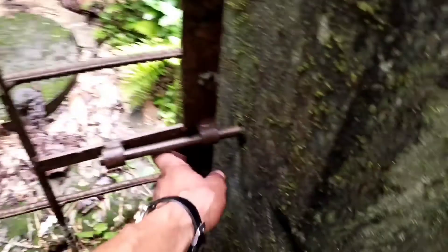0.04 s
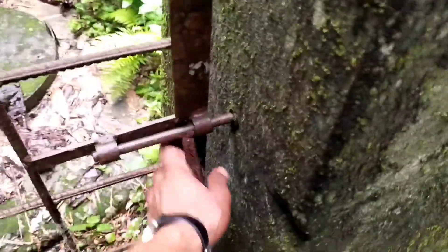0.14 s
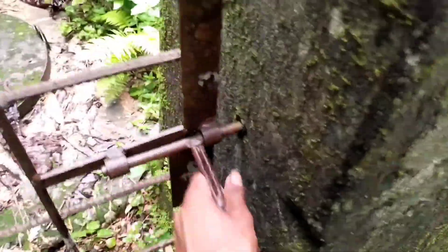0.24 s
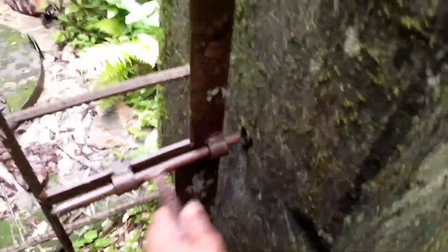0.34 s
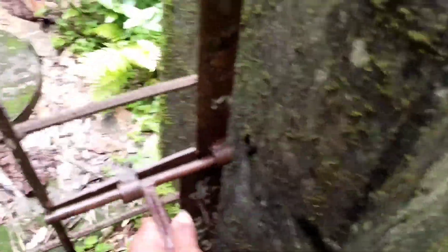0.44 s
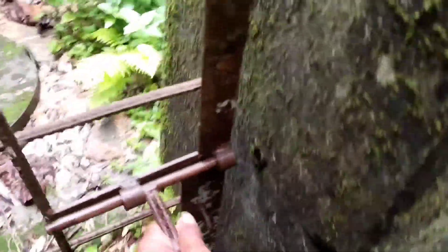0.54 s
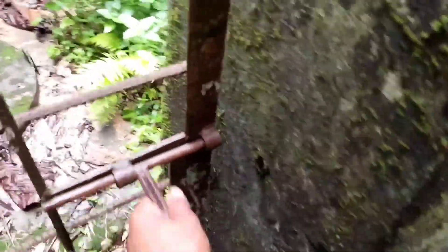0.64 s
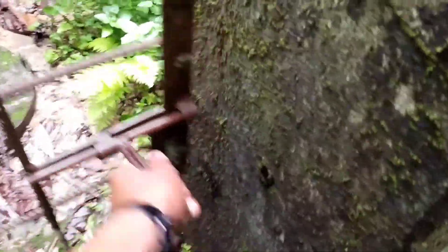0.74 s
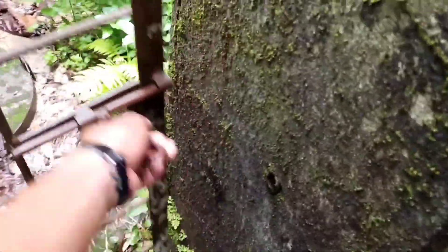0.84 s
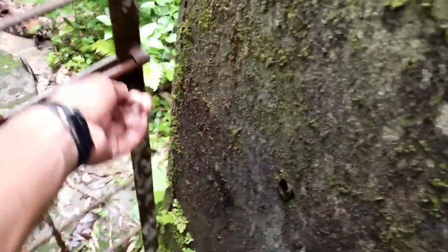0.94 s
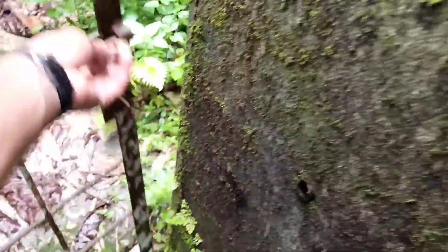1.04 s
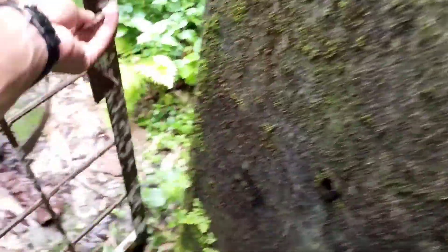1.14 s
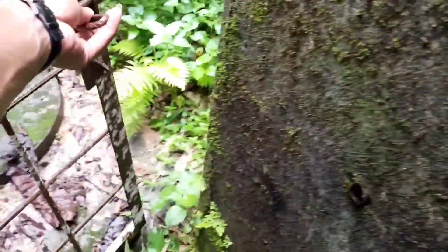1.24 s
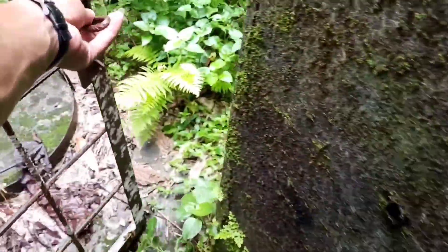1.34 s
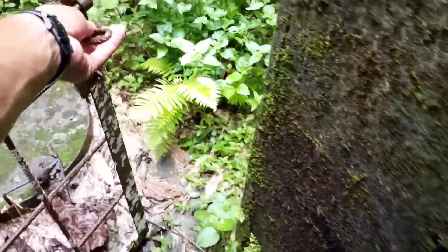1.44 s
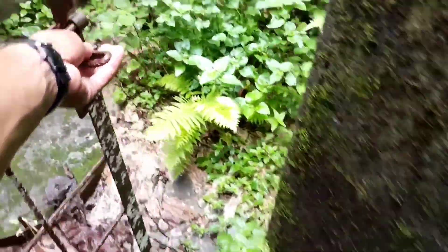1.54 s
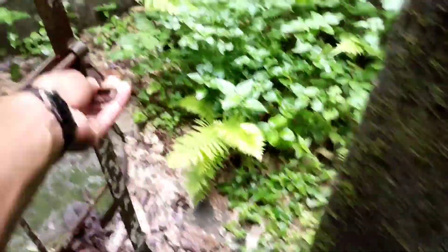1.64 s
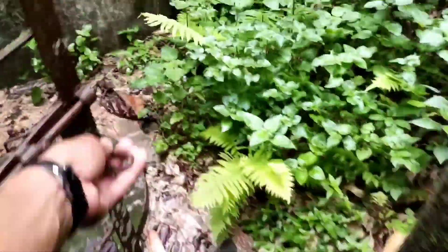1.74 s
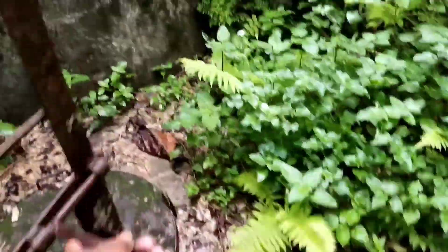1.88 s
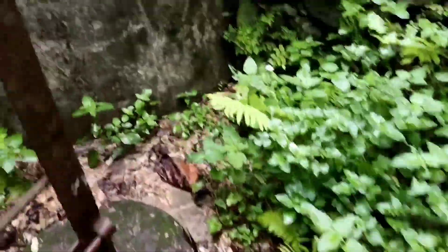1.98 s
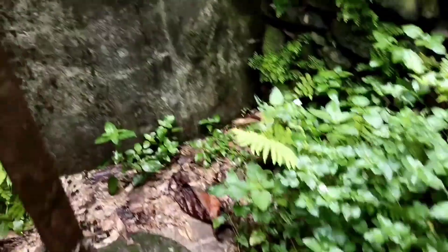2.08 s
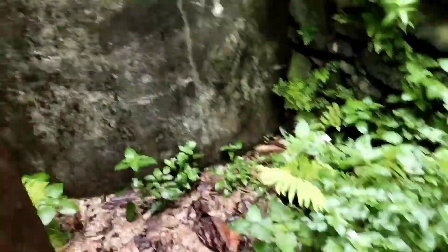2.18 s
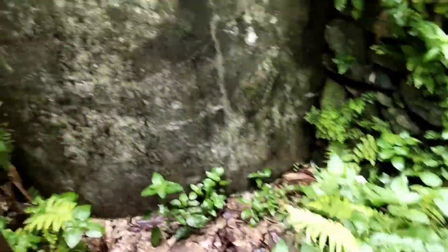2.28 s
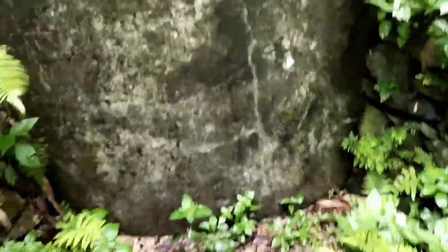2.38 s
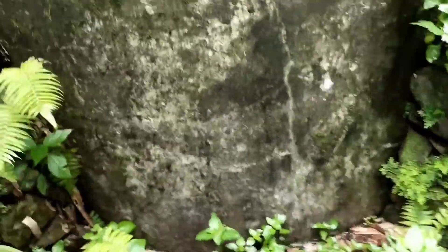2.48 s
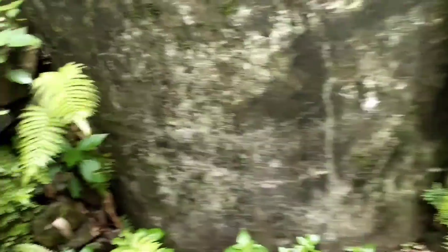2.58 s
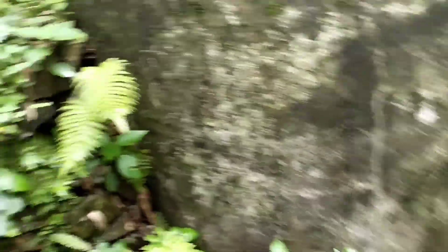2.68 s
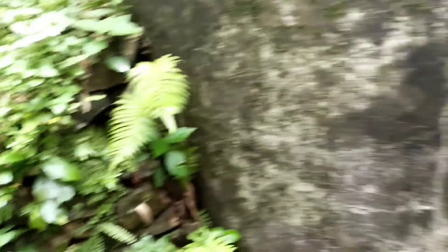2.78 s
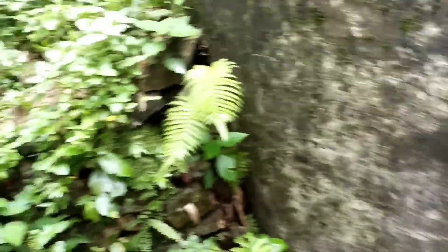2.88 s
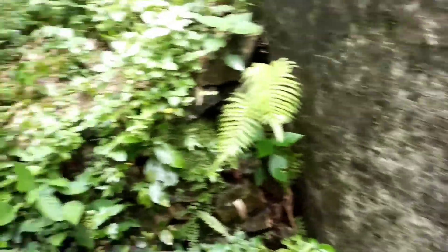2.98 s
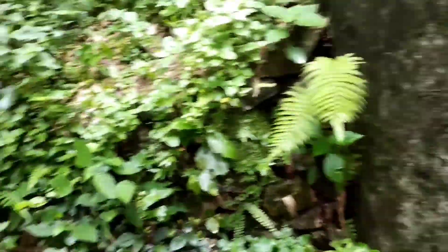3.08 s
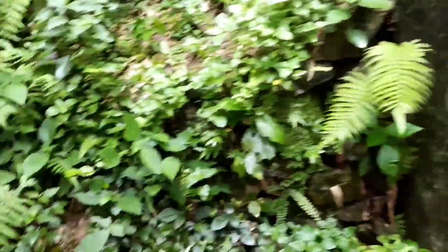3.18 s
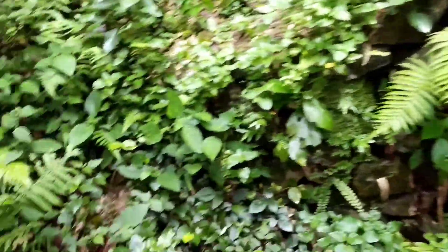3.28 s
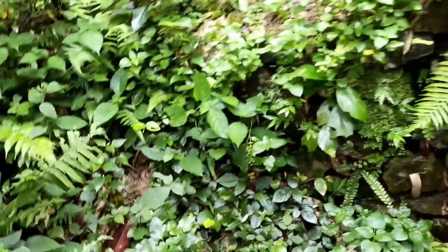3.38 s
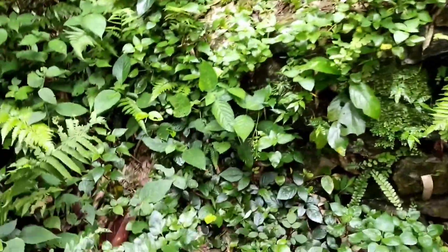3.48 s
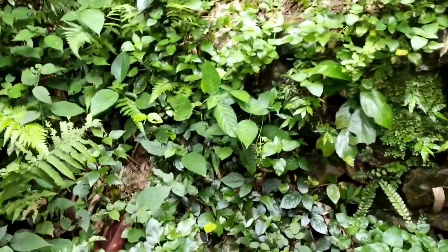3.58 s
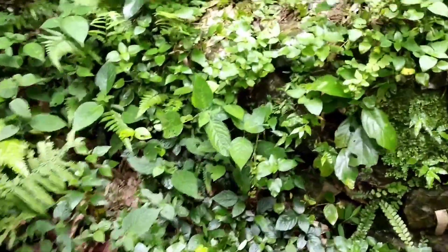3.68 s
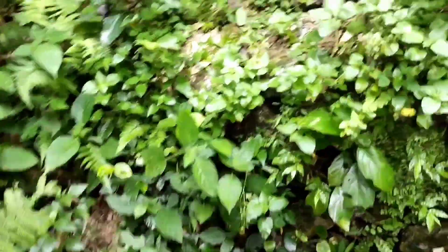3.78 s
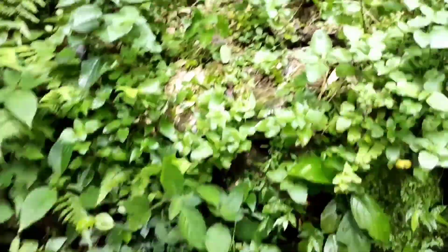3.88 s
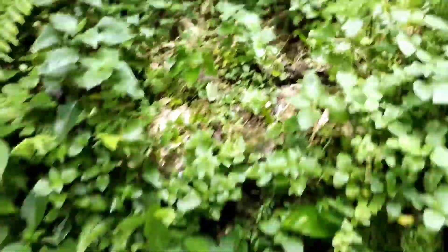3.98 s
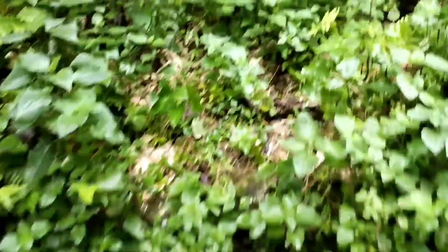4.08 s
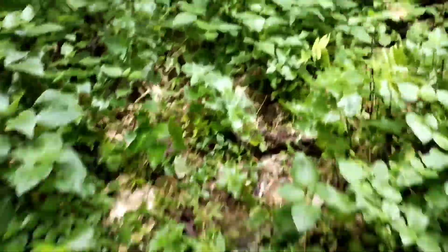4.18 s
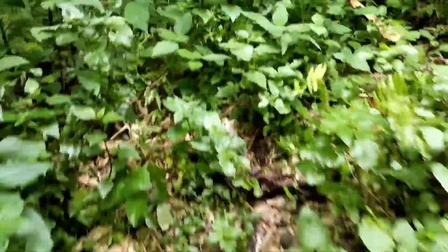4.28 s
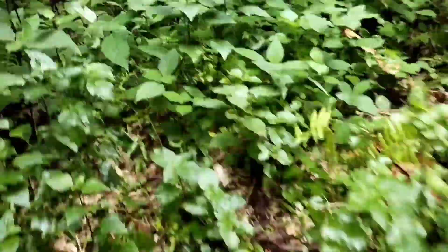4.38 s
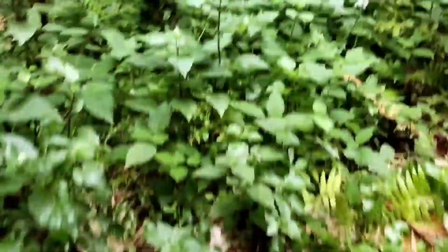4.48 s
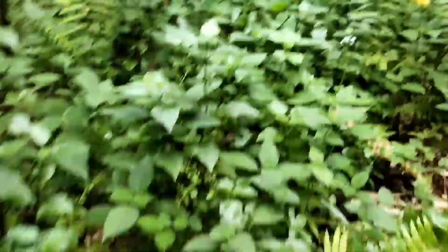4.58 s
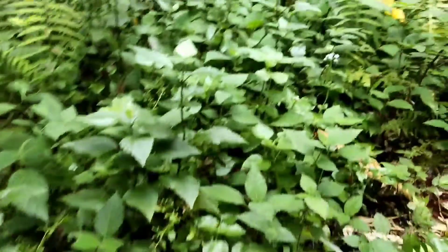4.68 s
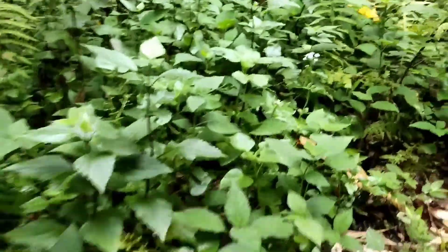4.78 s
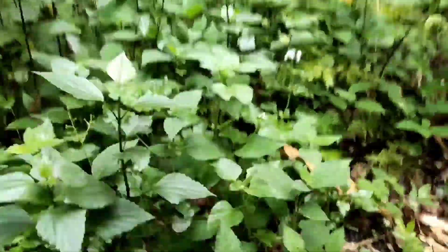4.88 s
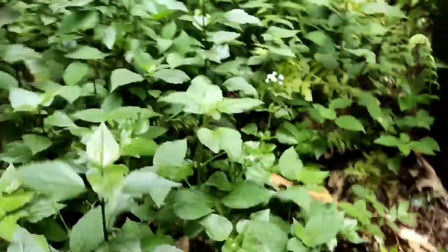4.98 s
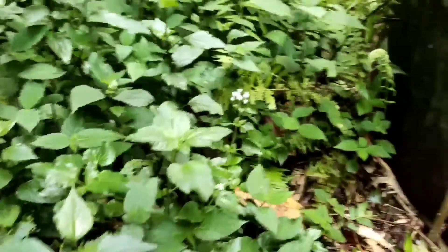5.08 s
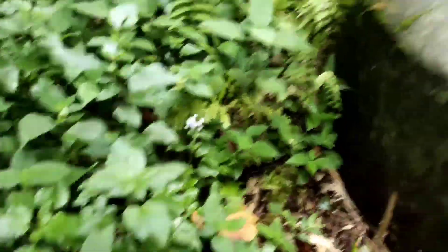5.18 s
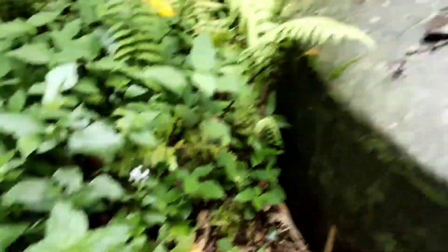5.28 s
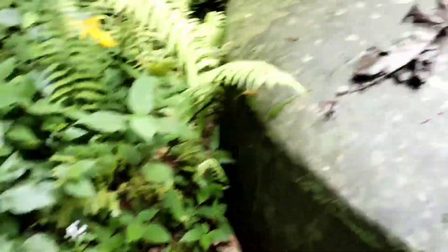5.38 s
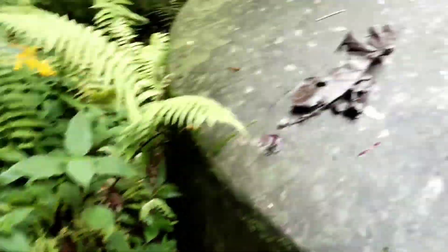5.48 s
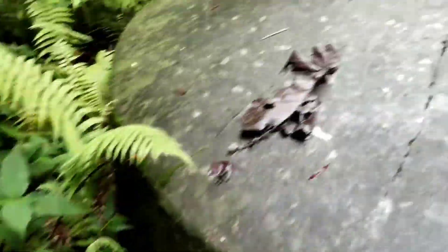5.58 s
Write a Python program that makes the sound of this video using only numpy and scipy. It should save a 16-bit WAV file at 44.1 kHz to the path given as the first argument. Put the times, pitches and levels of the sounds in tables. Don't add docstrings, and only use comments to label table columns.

```python
import sys
import numpy as np
from scipy import signal
from scipy.fft import rfft, irfft
from scipy.io import wavfile
from scipy.ndimage import uniform_filter1d

SR = 44100
rng = np.random.default_rng(int(sys.argv[2]) if len(sys.argv) > 2 else 0)


def master(y):
    cut = np.clip(np.atleast_2d(y).T, -1, 1)
    pcm = np.round(cut * 32767)
    wavfile.write(sys.argv[1], SR, pcm.astype(np.int16))


def gain_from_db(level_db):
    decades = np.asarray(level_db, float) / 20
    return 10 ** decades


N = 248555


def evened(x):
    return x / np.sqrt(np.mean(x ** 2) + 1e-20)


def read(points, hz):
    f, value = np.transpose(points)
    return np.interp(np.log(hz + 1), np.log(f + 1), value)


def add(mix, s, sound):
    part = mix[:, round(s * SR):][:, :sound.shape[1]]
    part += sound[:, :part.shape[1]]


def sides(pan_db):
    return gain_from_db(np.array([[.5], [-.5]]) * pan_db) / np.cosh(pan_db * np.log(10) / 40)


def noise(shape, level_db, patchy_db, grain_db, size=512):
    # (frequency [Hz], correlation [-1..1])
    likeness = [(60, 0.4), (180, 0.94), (550, 0.73), (1650, -0.19), (4970, 0.073), (15000, -0.026)]
    # (frequency [Hz], left-right [dB])
    balance = [(60, 0.0), (180, 0.5), (550, -1), (1650, 2), (4970, 6.5), (15000, -2.5)]
    frames, hz = 4 * N // size + 5, np.fft.rfftfreq(size, 1 / SR)
    a, b, c, d, patches = rng.standard_normal((frames, len(hz), 5)).T
    patches = uniform_filter1d(patches, size=3, axis=0)
    patches = evened(uniform_filter1d(patches, size=12, axis=1))
    flicker = np.minimum(rng.exponential(1, frames), 5)
    same = np.clip(read(likeness, hz), -1, 1)[:, None]
    left = a + 1j * b
    right = same * left + np.sqrt(1 - same ** 2) * (c + 1j * d)
    z = np.array([left, right])
    z *= gain_from_db(read(shape, hz)[:, None] + patchy_db * patches + grain_db * flicker)
    z *= gain_from_db(np.multiply.outer([.5, -.5], read(balance, hz)))[:, :, None]
    wave = signal.istft(z, nperseg=size, noverlap=size - size // 4)[1][:, :N]
    return gain_from_db(level_db) * evened(wave)


def undergrowth():
    # (time [s], level [dB])
    sway = [(0.0, -2), (.3, -9), (.75, -11.5), (.92, 8.5), (1.15, -2), (1.6, 4.5), (2.1, -7), (2.3, -5),
            (2.75, -5.5), (3.25, -3.5), (3.42, -19.5), (3.68, -1), (4.25, 0.5), (4.5, 8), (4.75, 2),
            (4.95, 5.5), (5.35, -4.5), (5.64, 4.5)]
    # (start [s], length [s], strength [dB])
    brushes = [(0.0, 0.19, 5.5), (1.15, 0.28, 4.5), (1.612, 0.15, 9), (1.795, 0.19, 4.5),
               (2.095, 0.17, 6.5), (2.395, 0.19, 4.5), (2.71, 0.67, 1), (3.392, 0.43, 1), (4.31, 0.18, 4),
               (4.779, 0.33, 4.5), (5.31, 0.21, 1.5)]
    # (resting level [dB], share of sway [dB/dB], share of brushing [dB/dB])
    layers = [
        (-56.5, 0.99, 0.042),
        (-59, 0.2, 0.49),
        (-51.5, 0.033, 0.74),
        (-65, 0.086, 0.88),
    ]
    # (frequency [Hz], density [dB per Hz])
    rumble_shape = [(24, -47), (40, -9), (76, -7), (92, 3.5), (122, -1), (173, -9.5), (238, -7.5),
                    (275, -2), (400, -15), (520, -31), (880, -120)]
    foot_shape = [(88, -28), (150, 1), (465, -1.5), (627, -3.5), (728, -9.5), (972, 2.5), (1400, -12),
                  (1820, -63), (3080, -120)]
    leaf_shape = [(350, -108), (600, -39), (1020, -7.5), (1220, -4), (1760, 0), (2130, 0.5), (2710, 1),
                  (3630, -4), (5000, -8), (6500, -9), (11000, -120)]
    fine_shape = [(2240, -6.5), (3800, 0.5), (4180, -12), (4690, -4), (6450, 1.5), (8820, -5.5),
                  (13200, -9.5), (14900, -17), (16000, -12.5)]
    insect_shape = [(2350, -29), (4000, 7), (4570, -8), (4800, -17), (5150, 18), (6240, -1), (7100, 18),
                    (7710, -9), (8500, -10), (11000, -41), (18700, -120)]
    rise_s, fall_s, away_db_per_s = 0.011, 0.047, 1.22
    t = np.arange(N) / SR
    sway_db, brush_db = np.interp(t, *np.transpose(sway)), 0
    for s, length, db in brushes:
        brush_db = brush_db + db * np.interp(t, [s, s + rise_s, s + length, s + length + fall_s], [0, 1, 1, 0])
    rumble_db, foot_db, leaf_db, fine_db = (rest + a * sway_db + b * brush_db for rest, a, b in layers)
    low = noise(rumble_shape, rumble_db + 1.5, 2.6, .6, size=1024)
    low += noise(foot_shape, foot_db + 1.5, 2.4, .9, size=1024)
    leaves = noise(leaf_shape, leaf_db - away_db_per_s * t + 2.5, 4.1, 0.35)
    leaves += noise(fine_shape, fine_db + 12, 4.0, 1.27)
    insects = gain_from_db(.5) * noise(insect_shape, -57, 2.0, .3)
    return low + leaves + insects


def squeaks():
    # (time [s], length [s], level [dB], frequency [Hz], width [Hz])
    squeak_events = [(0.25, 0.13, -38, 1280, 90), (.3, .06, -41, 3700, 50), (.52, 0.33, -44.5, 428, 35),
                     (0.61, 0.39, -38.5, 750, 97), (2.928, 0.09, -37, 1780, 380),
                     (3.36, 0.27, -44, 720, 59), (3.34, 0.21, -33, 2190, 120),
                     (.537, 0.035, -26, 7900, 600), (3.332, .13, -38, 3200, 40), (.54, .05, -53, 15450, 60),
                     (.54, .045, -48, 14000, 60), (.7, 0.24, -44, 2100, 66), (.163, 0.016, -40, 2900, 900),
                     (1.82, 0.13, -46, 2400, 500), (3.12, .16, -55, 2000, 60), (2.74, .05, -52, 4500, 700),
                     (4.27, .12, -56, 3000, 120), (4.4, .1, -55, 980, 90), (0.0, .2, -53, 2000, 200),
                     (3.329, .045, -45, 11000, 900), (3.329, .04, -48, 13200, 500),
                     (3.335, .3, -41, 1500, 450), (3.33, .05, -41, 5500, 500), (.25, .07, -46, 5900, 200),
                     (.25, .05, -54, 11800, 500), (1.03, .04, -49, 6500, 120), (.43, .05, -44, 5200, 700),
                     (2.93, .04, -44, 2500, 150)]
    out = np.zeros((2, N))
    for s, length, db, hz, width_hz in squeak_events:
        size = 2 * int(length * SR / 2)
        grit = rng.standard_normal((3, 20000))[:, :size]
        away = (np.fft.rfftfreq(size, 1 / SR) - hz) / width_hz
        tone = irfft(rfft(0.28 * grit[:2] + grit[2]) / (1 + (2 * away) ** 2))
        fall_db = 6.9 * np.linspace(0, 1, size)
        add(out, s, gain_from_db(db - fall_db) * evened(tone) * signal.windows.tukey(size, .3))
    return out


def clacks():
    # (time [s], peak [dB], frequency [Hz], t60 [s])
    contacts = [(.1635, -34, 2900, .02), (.2653, -24, 2100, .03), (.364, -26, 2230, .03),
                (.4299, -20, 2100, .03), (.4938, -12, 2300, .025), (.7951, -32, 2250, .03),
                (.8225, -33, 2150, .03), (.8345, -32, 2180, .03), (.9810, -27, 2600, .03),
                (1.0298, -21, 2500, .025), (1.0375, -24, 2400, .025), (1.057, -26, 2200, .03),
                (2.740, -38, 2300, .03), (2.9345, -33, 1900, .02), (2.938, -29, 1800, .03),
                (2.988, -30, 2000, .03), (3.4815, -28, 2350, .03), (4.639, -34, 1100, .04),
                (4.9098, -24.5, 1100, .02), (4.916, -31, 700, .03)]
    out, t = np.zeros((2, N)), np.arange(2000) / SR
    for s, db, hz, t60 in contacts:
        ratio = np.array([.84, 1, 1.21]) * rng.uniform(.97, 1.03, 3)
        phase = rng.random(2) * .15
        ring = np.sin(2 * np.pi * (np.outer(ratio * hz, t) + phase[:, None, None])).sum(1)
        add(out, s, gain_from_db(db - 3 - 60 * t / t60) * (1 - np.exp(-t / .0006)) * ring)
    return out


def frame_comb(count, width_hz, length):
    at = rng.integers(0, length // 2, count)
    lines = np.bincount(at, gain_from_db(3.0 * rng.standard_normal(count)), length // 2 + 1)
    away_hz = np.arange(-200, 201) * SR / length
    resonance = 1 / (1 + (2 * away_hz / width_hz) ** 2)
    power = signal.fftconvolve(lines ** 2, resonance, "same").clip(1e-9)
    overlap = np.clip(np.arange(len(lines)) * SR / length / 3000 - 1, 0, 1)
    return np.sqrt(power + overlap)


def fade(hz, t, ring):
    # (frequency [Hz], t60 [s])
    ring_t60 = [(400, 1.1), (700, 1.8), (900, 1.03), (1100, 1.25), (1500, 0.93), (2300, 0.86), (3200, 0.44),
                (5500, 0.25), (8000, 0.17), (14000, 0.18)]
    swell = 1 - np.exp(-np.outer((hz / 1000) ** 1.12, t + 0.0036) / 0.016)
    return swell * gain_from_db(-60 * t / (ring * read(ring_t60, hz))[:, None])


def bar_waves(bars, length):
    (hz, db), t = np.transpose(bars), np.arange(length) / SR
    return hz, db, fade(hz, t, 0.91) * np.exp(2j * np.pi * np.outer(hz, t))


def strike(comb, thick_db, hard_db, favoured_hz, damping_db, bars, bars_db, soft_db=0):
    # (frequency [Hz], level [dB])
    frame_shape = [(420, -45), (650, -5.5), (820, 1), (1050, -4.5), (1500, 1.5), (1850, 0), (2250, 0.5),
                   (2900, -1.5), (3400, 1), (3900, -7), (4500, -8.5), (5400, -7.5), (6200, -12), (8000, -9),
                   (12000, -27), (15500, -39)]
    # (frequency [Hz], left-right [dB])
    gate_pan = [(60, -2.5), (150, -0.5), (380, -4.5), (950, -5), (2380, 4.5), (5000, 1), (8500, -7),
                (15000, -1)]

    def colour(hz):
        octave = np.log2(hz / 2400 + 0.00094)
        spot_db = thick_db * np.clip(-4.5 * octave - 1.25, 0, 1)
        spot_db += hard_db * np.clip(4 * octave - 1.5, 0, 1)
        spot_db += 9 * np.exp(-(np.log2(hz / favoured_hz + 1e-3) / 0.42) ** 2)
        spot_db -= soft_db * np.clip(octave - 1.3, 0, 1)
        return gain_from_db(spot_db + np.outer([.5, -.5], read(gate_pan, hz)))

    t = np.arange(2 * len(comb) - 2) / SR
    shake = rng.standard_normal((2, len(t)))
    rough = irfft(rfft(shake + 0.22 * shake[::-1]) * comb)
    hz, frame_t, z = signal.stft(evened(rough), SR, nperseg=256, noverlap=192)
    z = z * (colour(hz) * gain_from_db(read(frame_shape, hz)))[:, :, None] * fade(hz, frame_t, 0.96)
    blur = signal.istft(z, SR, nperseg=256, noverlap=192)[1][:, :len(t)]
    bar_hz, bar_db, waves = bars
    chance = gain_from_db(1.8 * rng.standard_normal((2, len(bar_hz))))
    turns = (rng.random((2, len(bar_hz))) * [[1], [.45]]).cumsum(0)
    chance = chance * np.exp(2j * np.pi * turns)
    level = gain_from_db(bar_db - bar_db.max() + bars_db + 1.8 * (bar_hz < 900))
    song = (level * chance * colour(bar_hz) @ waves).real
    return (blur + song) * gain_from_db(-damping_db * t)


def gate():
    # (time [s], blow [dB], hardness [dB], favoured frequency [Hz], hand damping [dB/s])
    knocks = [(.164, -36.5, -13, 3140, 202), (.246, -29, 3.5, 1960, -10), (.263, -21, 0, 1396, -4),
              (.365, -23, -28, 2320, 0), (.429, -14, -1.5, 2220, -22), (.494, -13, -10, 2230, 60),
              (0.5379, -4, 5.5, 2650, 18), (.56, -33, -30, 520, 3), (.644, -17.5, 1.5, 2420, 20),
              (.981, -26.5, -3.5, 2400, 118), (1.03, -21.5, -0.5, 2420, 26), (2.741, -27.5, -1.5, 2430, 12),
              (2.821, -43.5, -1, 1065, 80), (2.934, -27, -14, 1700, 20), (3.3313, -8, 11.5, 2430, 11),
              (3.335, -26.5, -15, 844, 1.5)]
    # (time [s], pressure [dB])
    strokes = [
        [(.25, -58), (.3, -46), (.36, -37), (.46, -29), (.6, -22), (.66, -25), (.72, -36), (.8, -36)],
        [(2.75, -43), (2.85, -45.5), (2.9, -41)],
    ]
    # (thick at start [dB], thick at end [dB], grit [dB])
    travel = [
        (-5, 1.5, -16.5),
        (5, -3.5, -21),
    ]
    # (frequency [Hz], level [dB])
    bars_held = [(425.3, -56), (699.8, -45), (846.5, -43), (958.6, -43), (1077, -52), (1146, -49),
                 (1206, -47), (1270, -47), (1410, -50), (1480, -51), (1583, -48), (1740, -48), (1809, -46),
                 (1920, -45), (2003, -46), (2094, -44), (2143, -43), (2190, -44), (2223, -48), (2326, -48),
                 (2407, -43), (2536, -47), (2568, -40), (2627, -49), (2706, -45), (2767, -48), (2897, -43),
                 (3074, -50), (3422, -39), (3558, -56), (4200, -58), (5110, -56), (5450, -56), (6380, -58),
                 (6500, -56), (6850, -57), (7970, -50), (10900, -55), (11800, -56), (12430, -52),
                 (13000, -51), (15470, -57)]
    # (frequency [Hz], level [dB])
    bars_free = [(672.9, -54), (759.0, -53), (807.5, -53), (846, -52), (925.9, -52), (1040, -54),
                 (1136, -53), (1250, -55), (1430, -52), (1620, -54), (1809, -48), (1857, -49), (1900, -49),
                 (2003, -52), (2040, -48), (2143, -50), (2188, -39), (2234, -47), (2296, -46), (2340, -47),
                 (2372, -50), (2485, -50), (2652, -52), (2767, -57), (2929, -46), (3149, -60), (3438, -46),
                 (3548, -52), (3871, -64), (4188, -62), (4393, -64), (5250, -60), (5600, -60), (6500, -58)]
    thick_base_db, thick_per_db, thick_spot_db, thick_below_hz = 7, 1.15, 30, 1500
    swung_thick_db, swung_lag_s = 0.5, .00045
    out, t = np.zeros((2, N)), np.arange(900) / SR
    comb = frame_comb(count=1500, width_hz=8.0, length=2 ** 15)
    held, free = (bar_waves(bars, length=2 ** 15) for bars in (bars_held, bars_free))
    for s, db, hard_db, favoured_hz, damping_db in knocks:
        low_spot = np.clip(2 * np.log2(thick_below_hz / favoured_hz), 0, 1)
        thick_db = thick_base_db + thick_per_db * db + thick_spot_db * low_spot
        thick_db += swung_thick_db * (s > 3.3) * (favoured_hz > thick_below_hz)
        bars, bars_db = (held, -19.0) if s < 2 else (free, -15.0)
        ring = strike(comb, thick_db, hard_db, favoured_hz, damping_db, bars, bars_db, -2.2 * db - 14)
        ring /= np.sqrt(np.mean(ring[:, :900] ** 2))
        rebounds = np.cumsum(rng.uniform(0.0037, 0.015, 7))
        age = np.arange(ring.shape[1]) / SR - rebounds[:, None]
        ring *= 1 + 0.25 * (np.exp(-np.maximum(age, 0) / 0.002) * (age > 0)).sum(0)
        onset = 1 - np.exp(-t / (.0001 * gain_from_db(-1.2 * db)))
        ring[:, :900] *= (1 + 0.97 * np.exp(-t / 0.0028)) * onset
        thud = np.sin(2 * np.pi * 200 * t) * np.exp(-t / 0.0012)
        ring[:, :900] += (s < 2) * gain_from_db(0.68 * hard_db - 10.5) * thud
        ring[0] = np.roll(ring[0], round(swung_lag_s * SR) * (s > 2))
        add(out, s, gain_from_db(db - 8.5) * ring)
    for rows, (from_db, to_db, grit_db), bars in zip(strokes, travel, (held, free)):
        s, pressure_db = np.transpose(rows)
        t = np.arange(s[0], s[-1], 1 / SR)
        db, thick_db = np.interp(t, s, pressure_db), np.linspace(from_db, to_db, len(t))
        slips = gain_from_db(4.2 * np.minimum(rng.exponential(1, len(t)), 4))
        slips = slips * (rng.random(len(t)) < 350 / SR)
        for low_db, high_db, share_db in ((-40, -40, 0), (40, -40, thick_db), (-40, 40, grit_db)):
            body = strike(comb, low_db, high_db, 2420, 107, bars, -29.0)[:, :14000]
            body /= np.sqrt((body ** 2).sum(1).mean())
            drive = evened(slips) * signal.windows.tukey(len(t), .2)
            drive = drive * gain_from_db(np.minimum(db, -28) + share_db)
            add(out, s[0], signal.fftconvolve(body, drive[None], axes=1))
    return out


def grip():
    # (time [s], peak [dB], left-right [dB], thump [Hz], tick [dB])
    taps = [(0.2107, -31, 33, 475, -6), (1.92, -39, 17, 420, -20), (2.3068, -15.5, 24, 500, -6),
            (3.891, -27, 22, 440, -12), (5.6002, -22, 12, 520, -17), (5.6154, -15.5, 21, 470, -9.5)]
    out, t = np.zeros((2, N)), np.arange(500) / SR
    for s, db, pan_db, hz, tick_db in taps:
        glide = 1 + .5 * np.exp(-t / 0.0013)
        thump = -np.sin(2 * np.pi * hz * t * glide) * np.exp(-t * hz * 2.03)
        thump -= thump.sum() * np.exp(-t * hz) / np.exp(-t * hz).sum()
        tick = np.sin(2 * np.pi * np.outer([6000, 8400], t)) * np.exp(-t / 0.00039)
        push = sides(pan_db) * [thump, -np.roll(thump, 8)]
        add(out, s, gain_from_db(db + 9.5) * (push + gain_from_db(tick_db) * tick * [[1], [.4]]))
    return out


def scuffs():
    # (time [s], length [s], level [dB], centre [Hz], width [octaves])
    rubs = [(1.279, 0.37, -50, 196, 0.27), (1.61, 0.19, -55, 1000, 0.49), (2.091, 0.15, -48, 1980, 0.51),
            (2.226, 0.078, -40.5, 596, 2.1), (3.193, 0.17, -51.5, 88.2, 0.79),
            (4.297, 0.14, -49, 2480, 0.76), (4.389, 0.2, -47, 495, 0.25), (4.92, 0.13, -44.5, 1180, 0.81),
            (4.931, 0.11, -47, 5500, 0.41), (4.763, 0.4, -50.5, 450, .35), (2.898, 0.38, -52, 1330, 0.52),
            (5.28, 0.22, -58, 915, .3), (0.382, .15, -48.5, 400, 0.82), (1.581, 0.13, -51.5, 444, 0.41),
            (1.846, 0.28, -57, 168, 0.68), (2.349, 0.13, -52, 990, 0.91), (4.627, .1, -51, 600, .7),
            (2.33, .2, -51, 280, .6), (4.6, .2, -53, 1500, .7), (4.95, .1, -50, 1400, .4),
            (3.9, .2, -53, 190, .5), (3.7, .25, -54, 250, .6)]
    out = np.zeros((2, N))
    for s, length, db, centre_hz, octaves in rubs:
        size = 2 * int(length * SR / 2)
        grit = rng.standard_normal((3, 200 * 90))
        grains = gain_from_db(1.7 * np.repeat(rng.exponential(1, size=200), repeats=90))
        grit = (grit * grains)[:, :size]
        hz = np.fft.rfftfreq(size, 1 / SR) + 1
        band = np.exp(-(np.log2(hz / centre_hz) / octaves) ** 2)
        rub = irfft(rfft(grit[:2] + 1.2 * grit[2]) * band)
        add(out, s, gain_from_db(db) * evened(rub) * signal.windows.tukey(size, .6))
    return out


def stones():
    # (time [s], peak [dB], frequency [Hz], t60 [s], left-right [dB])
    clicks = [(4.229, -44.5, 2080, 0.16, 0), (4.487, -42, 1020, 0.15, -9), (4.639, -32.5, 1337, 0.2, 3),
              (4.705, -35, 1980, 0.2, 0.0), (4.768, -48, 1905, 0.26, 6), (4.908, -29.5, 1075, 0.14, -2)]
    out, t = np.zeros((2, N)), np.arange(6000) / SR
    for s, db, hz, t60, pan_db in clicks:
        ratio = np.r_[1, 1.04, rng.uniform(420, 2700, 14) / hz]
        phase = rng.random((2, 16, 1))
        fall_db = -60 * t / t60 * np.r_[1, 1, np.full(14, 3.6)][:, None]
        fall_db = fall_db - 1 * (np.arange(16) > 1)[:, None]
        ring = (np.sin(2 * np.pi * (np.outer(ratio * hz, t) + phase)) * gain_from_db(fall_db)).sum(1)
        band = signal.butter(2, [300, 2500], "band", fs=SR)
        crack = signal.lfilter(*band, rng.standard_normal((2, len(t))))
        add(out, s, gain_from_db(db - 7.5) * sides(pan_db) * (ring + 2.3 * crack * np.exp(-t / 0.0048)))
    return out


def scene():
    return undergrowth() + squeaks() + clacks() + gate() + grip() + scuffs() + stones()


def top_cut(x):
    return signal.sosfilt(signal.butter(12, 15900, fs=SR, output="sos"), x)


def record(dry):
    dry = signal.sosfilt(signal.butter(3, 75, "high", fs=SR, output="sos"), dry)
    dry = dry - 0.6 * signal.lfilter(*signal.iirpeak(3750, 6.0, fs=SR), dry)
    power_db = 10 * np.log10(abs(uniform_filter1d((dry ** 2).max(0), size=60)) + 1e-12)
    fall_db = np.arange(N) * 37.0 / SR
    over_db = np.maximum(np.maximum.accumulate(power_db + fall_db) - fall_db + 47.5, 0)
    wet = dry / gain_from_db(0.038 * uniform_filter1d(over_db, size=200))
    wet = .95 * np.tanh(wet / .95)
    wet = signal.oaconvolve(wet, signal.firwin(255, 15700, fs=SR)[None], "same")
    wet[:, round(5.636 * SR):] = 0
    return top_cut(wet)


dry = scene()
out = record(dry)
master(out)
```